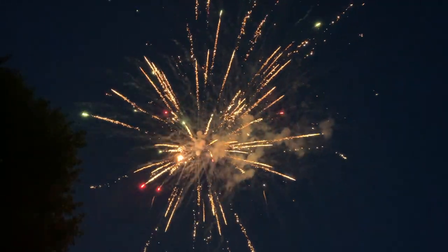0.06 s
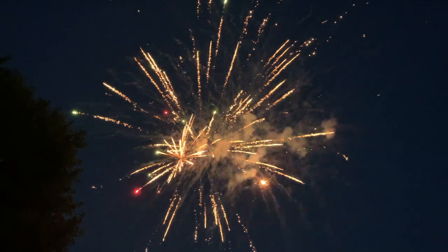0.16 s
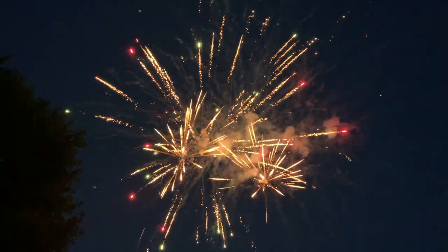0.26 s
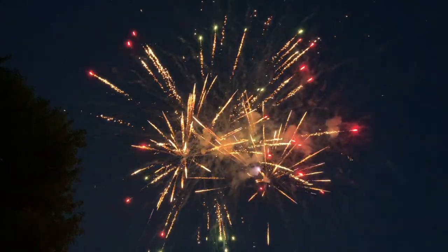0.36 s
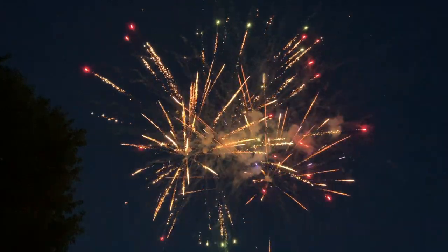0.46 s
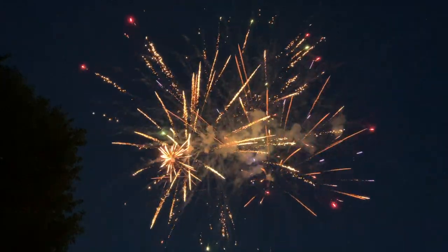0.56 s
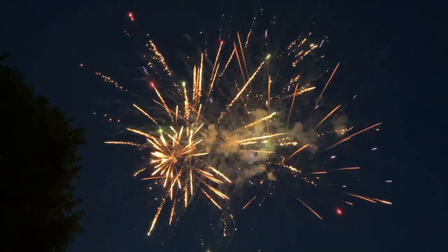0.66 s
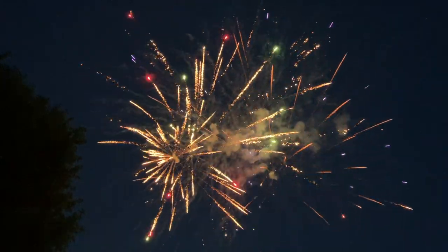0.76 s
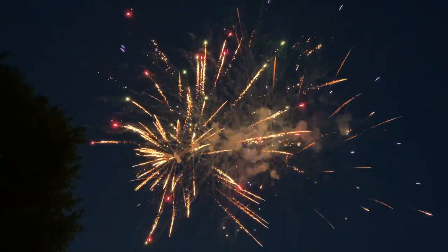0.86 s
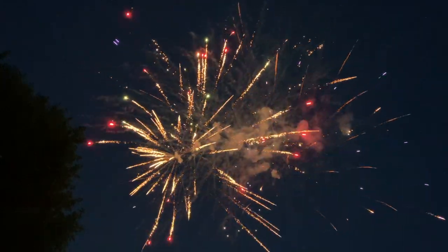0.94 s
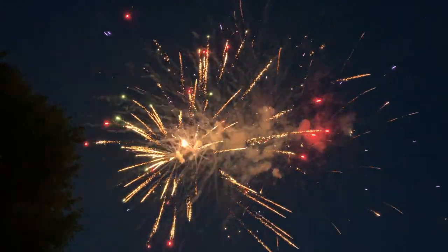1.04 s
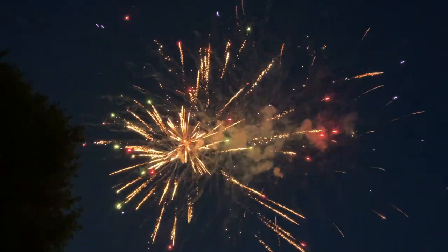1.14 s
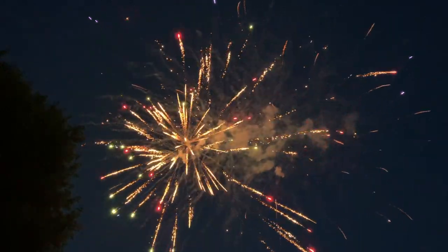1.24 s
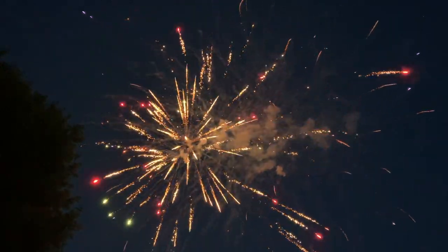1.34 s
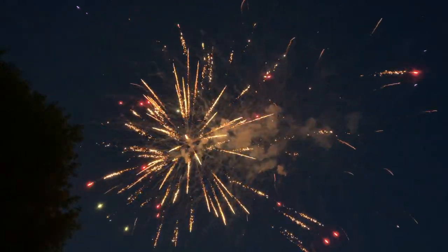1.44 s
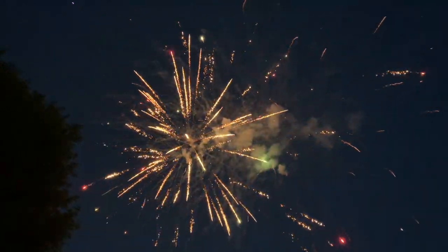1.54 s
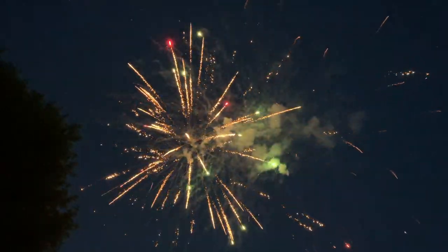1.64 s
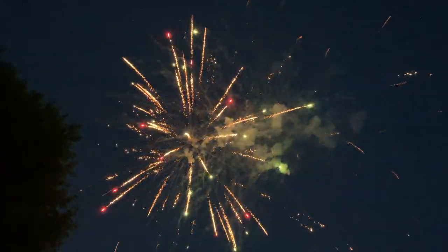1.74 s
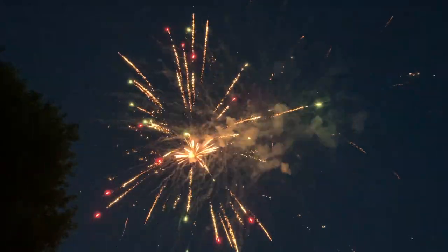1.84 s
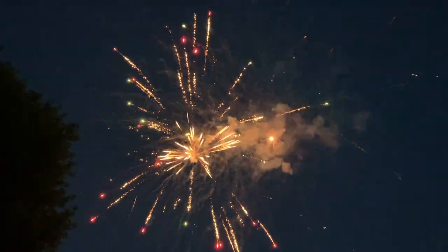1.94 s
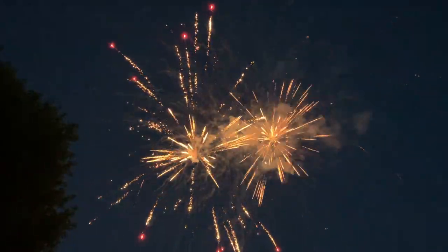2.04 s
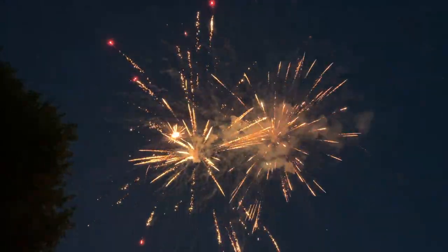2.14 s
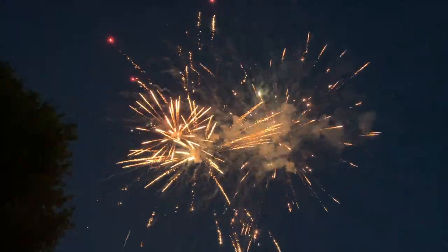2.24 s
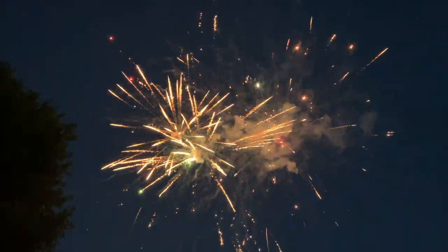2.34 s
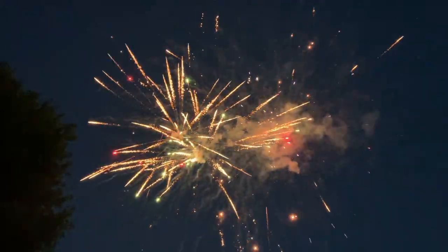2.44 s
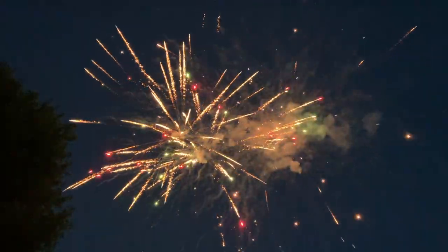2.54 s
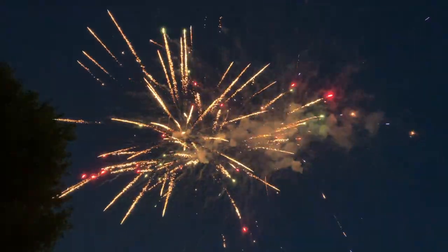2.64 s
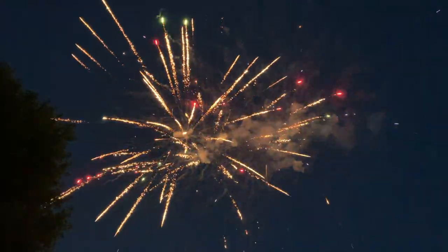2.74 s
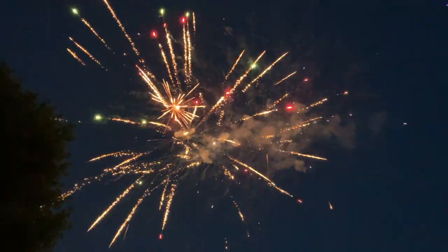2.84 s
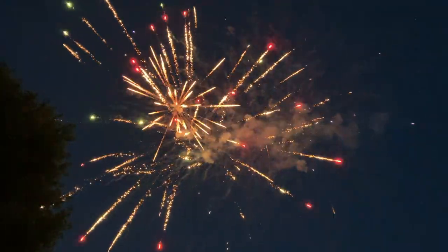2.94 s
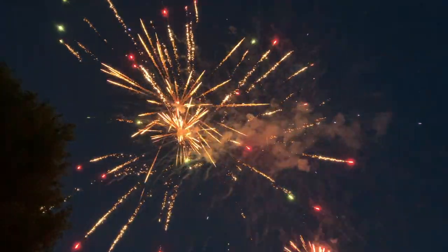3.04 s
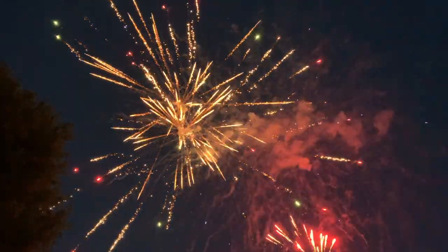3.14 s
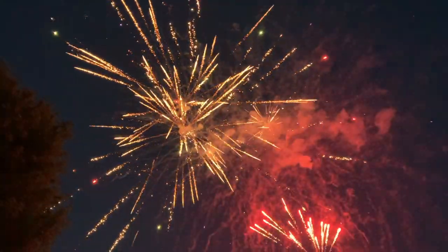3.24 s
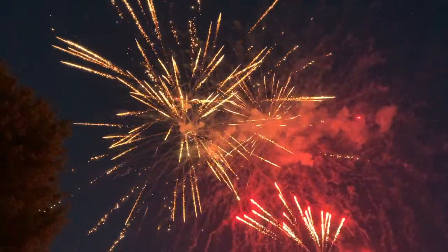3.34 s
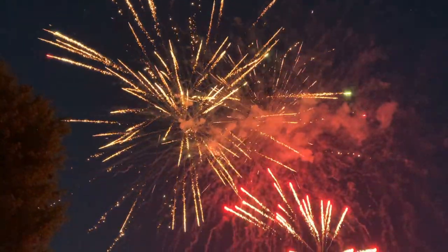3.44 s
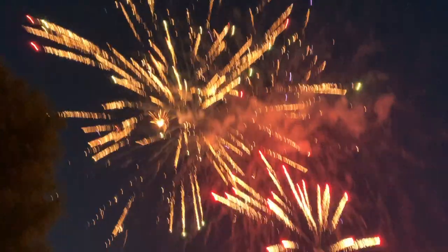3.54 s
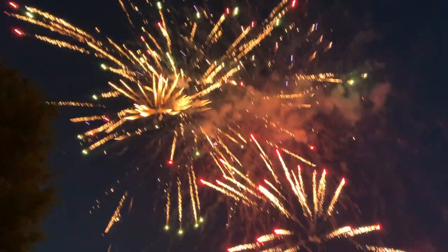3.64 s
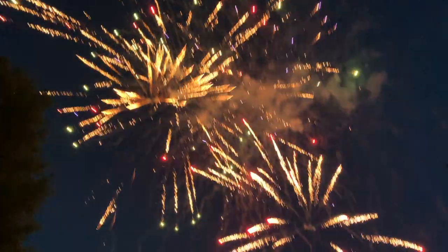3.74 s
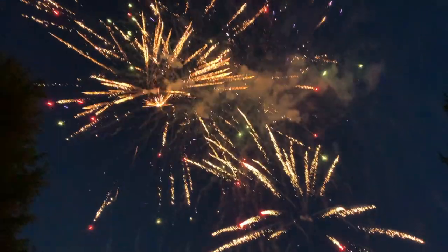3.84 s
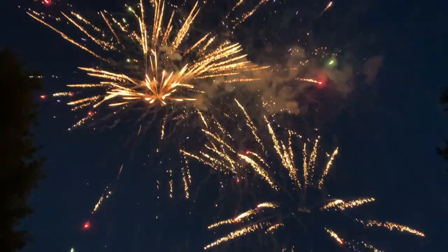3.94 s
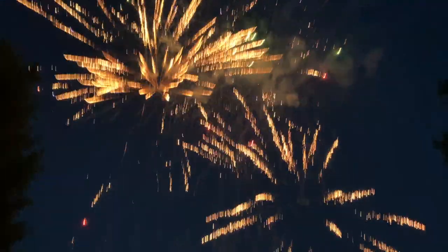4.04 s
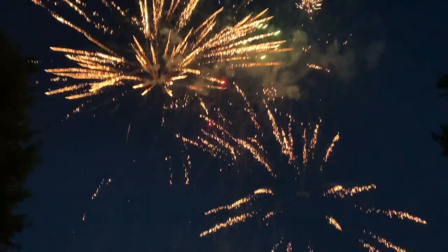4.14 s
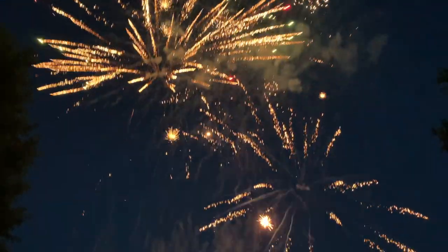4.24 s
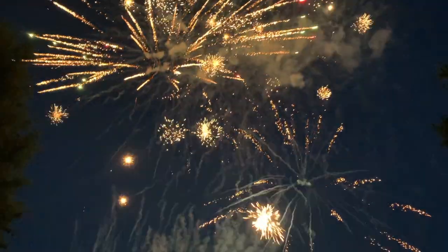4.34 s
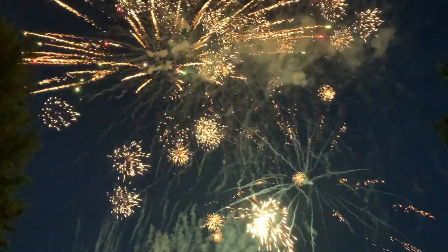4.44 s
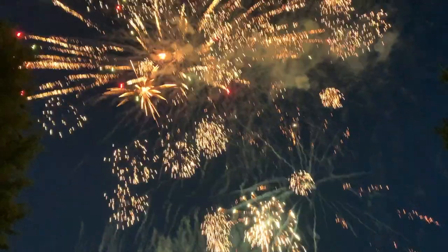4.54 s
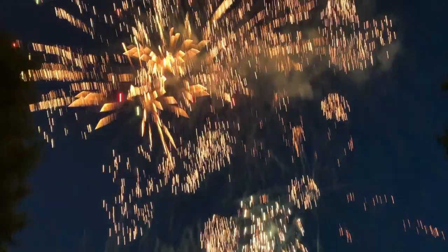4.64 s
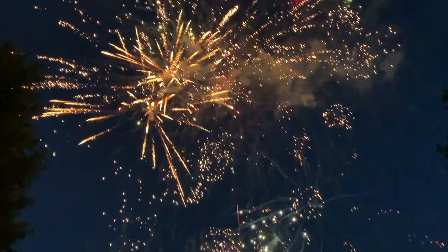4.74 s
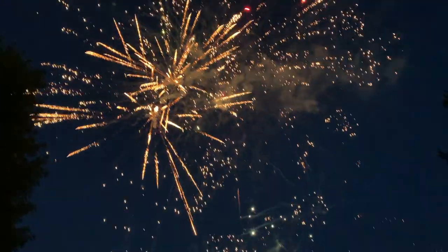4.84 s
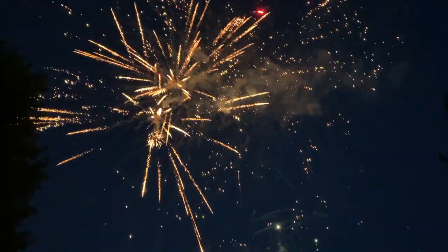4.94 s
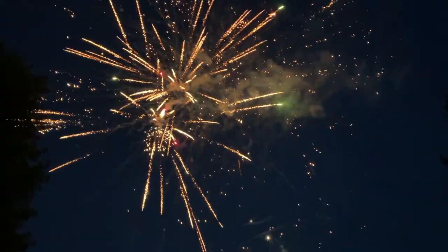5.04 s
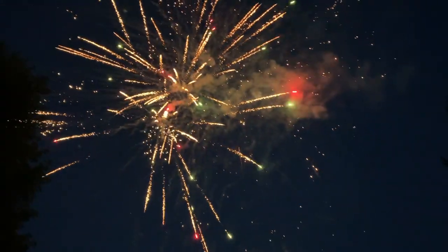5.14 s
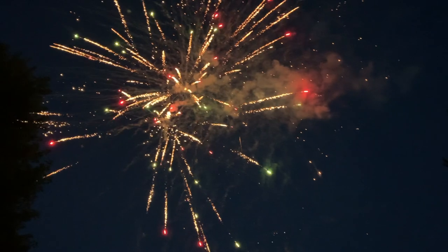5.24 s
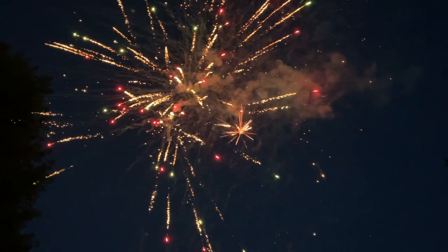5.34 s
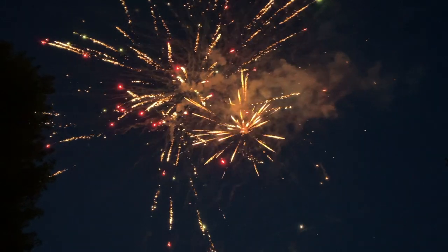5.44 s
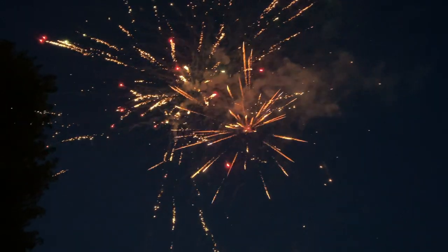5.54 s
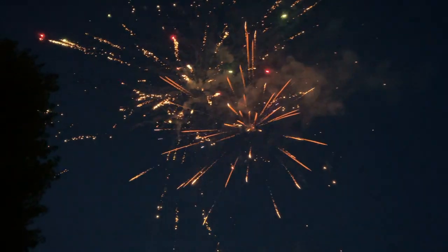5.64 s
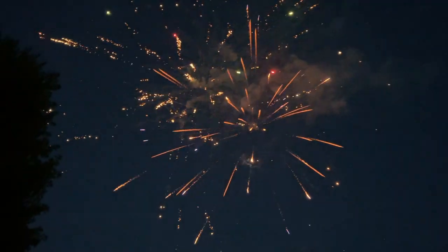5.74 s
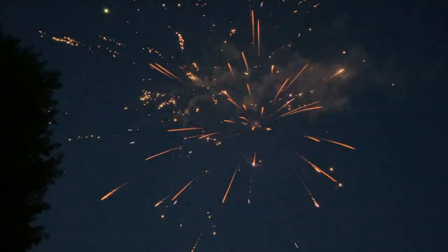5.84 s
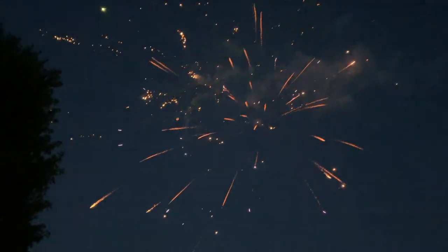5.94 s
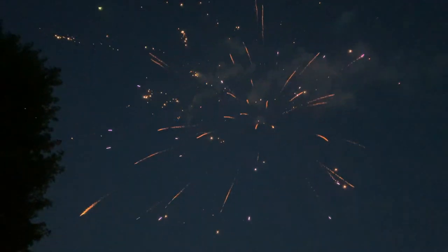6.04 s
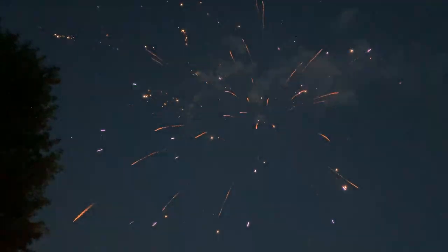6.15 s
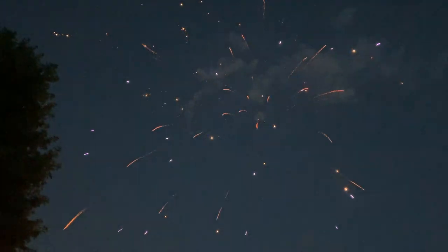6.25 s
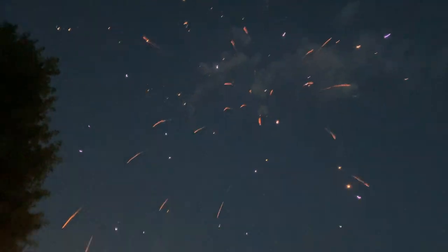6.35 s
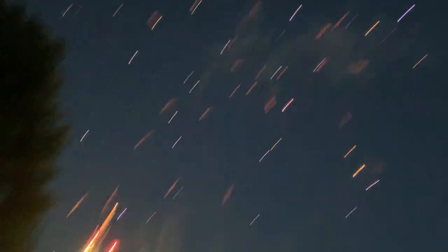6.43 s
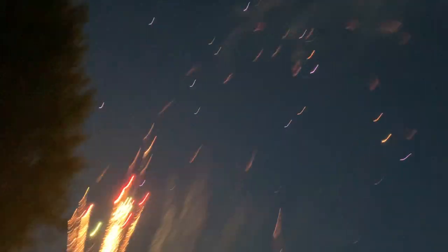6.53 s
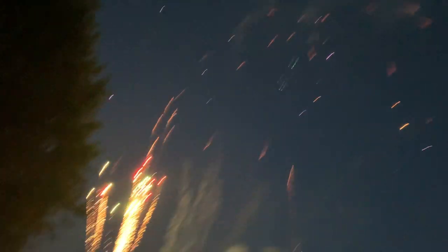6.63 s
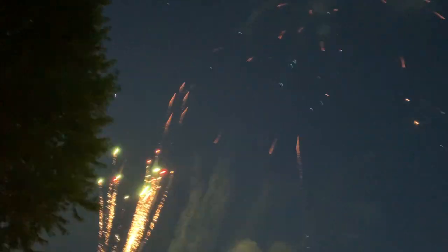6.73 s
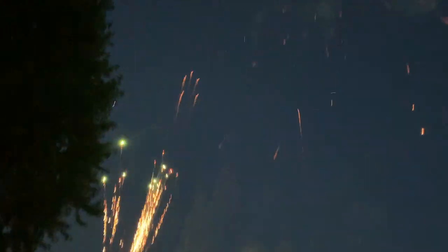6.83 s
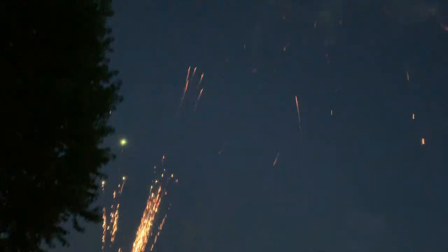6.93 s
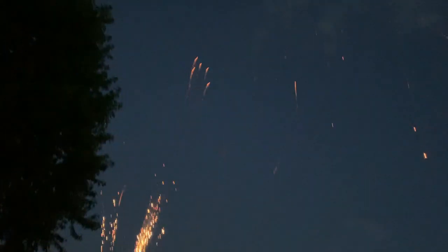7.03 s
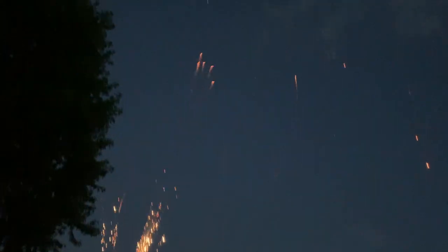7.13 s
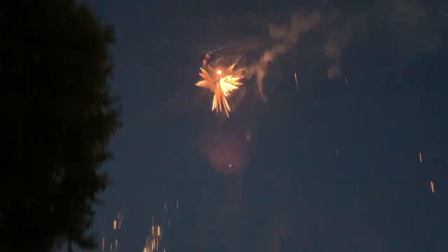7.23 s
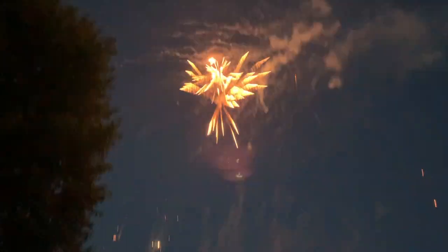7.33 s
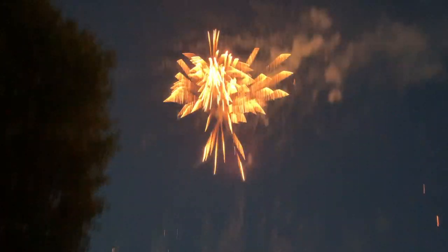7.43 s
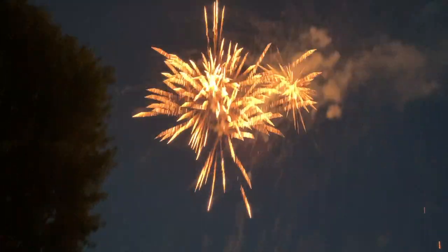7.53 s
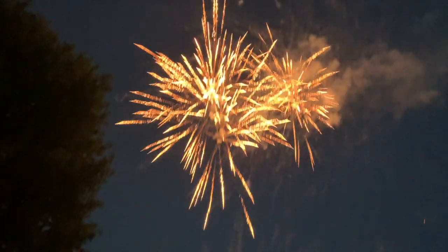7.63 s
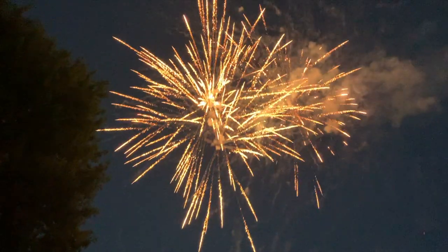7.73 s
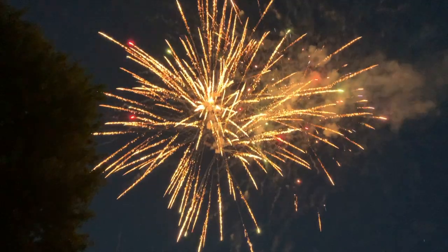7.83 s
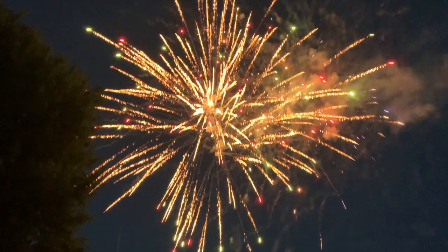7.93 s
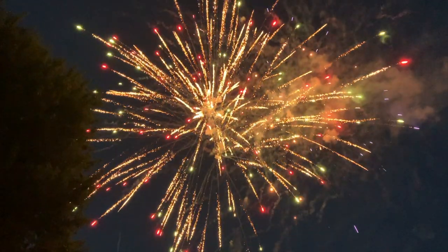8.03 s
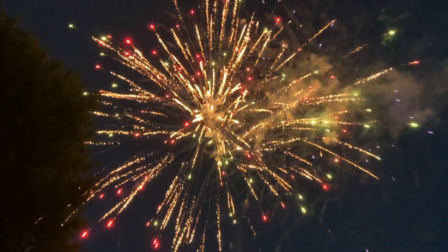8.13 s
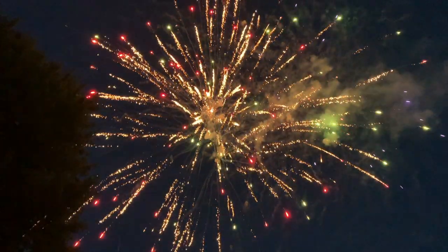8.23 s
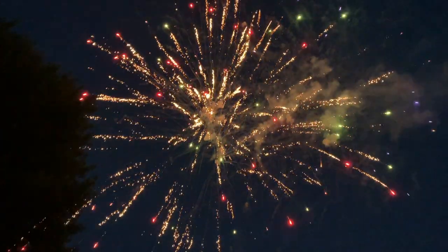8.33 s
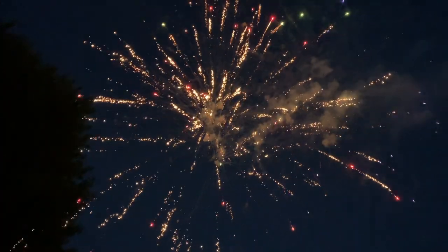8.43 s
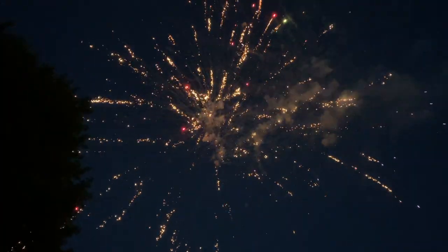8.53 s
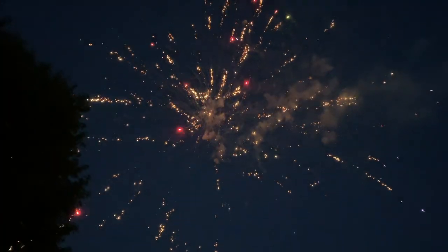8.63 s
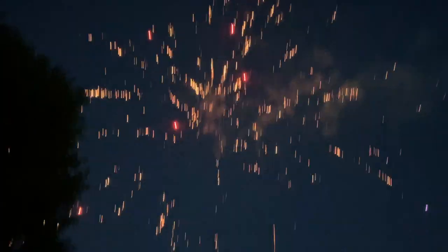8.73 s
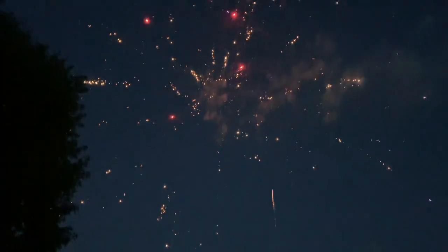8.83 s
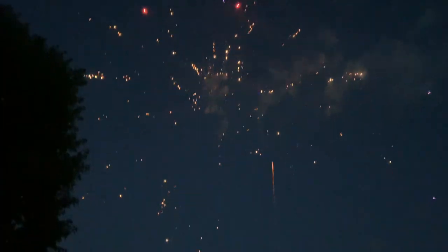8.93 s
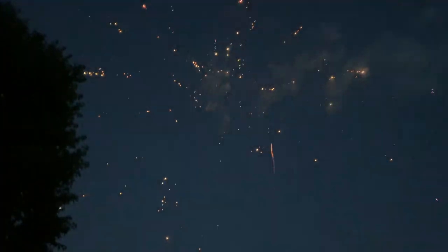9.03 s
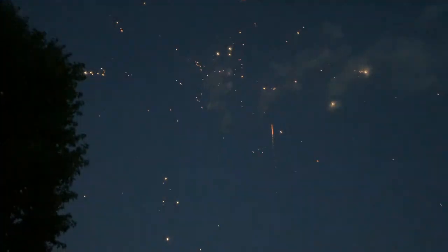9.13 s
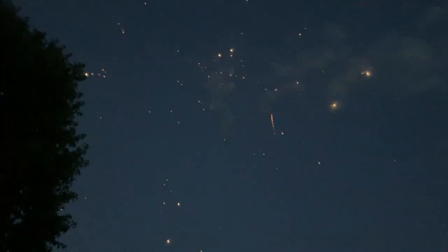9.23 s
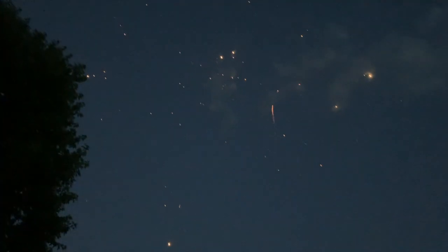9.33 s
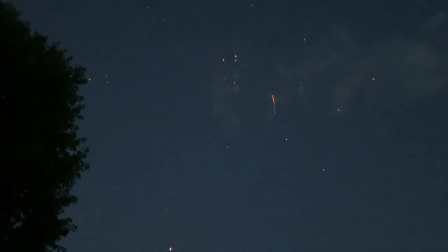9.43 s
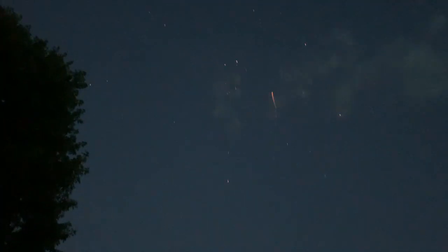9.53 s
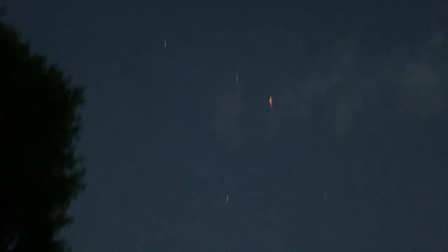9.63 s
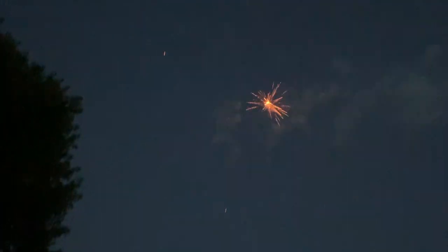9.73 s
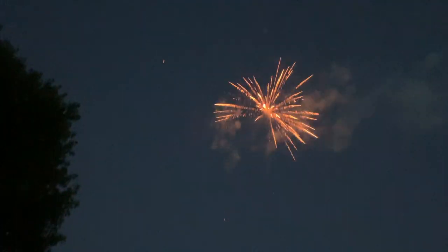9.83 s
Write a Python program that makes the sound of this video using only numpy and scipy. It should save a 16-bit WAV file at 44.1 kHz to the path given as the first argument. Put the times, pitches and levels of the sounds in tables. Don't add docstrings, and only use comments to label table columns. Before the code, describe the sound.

Outdoors at night, firework shells burst close overhead with heavy thumps, booms and sharp snaps. Hollow mortar thuds and dry wall slaps fall between them. Around the middle a short swarm of crackling pops follows a bright crack, then bangs thin out into rumble and faint distant thuds. A rapid cluster of launch thumps leads to a dense volley, then fading echoes and one last bang. Handheld phone sound, stereo, peaks squashed.

```python
import sys
import numpy as np
from scipy import signal
from scipy.fft import rfft, irfft, next_fast_len
from scipy.io import wavfile
from scipy.ndimage import uniform_filter1d

SR = 44100
rng = np.random.default_rng(int(sys.argv[2]) if len(sys.argv) > 2 else 0)


def materialize(psi):
    bounded = np.clip(np.atleast_2d(psi).T, -1, 1)
    quanta = np.round(bounded * 32767).astype(np.int16)
    wavfile.write(sys.argv[1], SR, quanta)


def magnitude_from_level(level_db):
    exponent = np.asarray(level_db, float) / 20
    return 10 ** exponent


N = 435708
HOP = 128
KIT = 4096
T = (np.arange(KIT) - KIT // 4) / SR
HZ = np.fft.rfftfreq(KIT, 1 / SR)


def along(points, hz, axis=1):
    rows = np.asarray(points, float)
    return np.interp(np.log(hz + 1), np.log(rows[:, 0] + 1), rows[:, axis])


def band(hz, lo_hz, hi_hz, order):
    low_side = 1 + (lo_hz / (hz + 1e-3)) ** (2 * order)
    high_side = 1 + (hz / hi_hz) ** (2 * order)
    return 1 / np.sqrt(low_side * high_side)


def filtered(x, response):
    m = next_fast_len(x.shape[-1] + 8192)
    spectrum = rfft(x, m) * response(np.fft.rfftfreq(m, 1 / SR))
    return irfft(spectrum, m)[..., :x.shape[-1]]


def pulse(lo_hz, hi_hz, order, late=0.):
    shape = band(HZ, lo_hz, hi_hz, order=order)
    delay = np.exp(-2j * np.pi * HZ * (KIT // 4 / SR + late))
    return irfft(shape * delay, KIT) / np.mean(shape)


def crack(lo_hz, hi_hz, t60, rise, shared):
    noise = rng.standard_normal((3, KIT))
    mix = np.clip(shared, 0, 1)
    noise = np.sqrt(mix) * noise[0] + np.sqrt(1 - mix) * noise[1:]
    noise = noise * magnitude_from_level(-60 * np.where(T > 0, T / t60, -T / rise))
    out = irfft(rfft(noise) * band(HZ, lo_hz, hi_hz, order=3), KIT)
    return out / np.abs(out).max()


def add(track, s, sound):
    at = round(s * SR) + KIT - KIT // 4
    track[:, at:at + KIT] += sound


# [s, dB]
SKY_ROAR = [(0, -53), (.2, -51.5), (1.499, -55.5), (2.7, -51.5), (4.1, -50), (5.2, -54), (6, -55.5),
            (6.7, -57.5), (7.299, -57.5), (7.9, -47), (8.25, -51.5), (9, -54), (9.88, -58.5)]
# [Hz, dB per Hz]
RUMBLE_COLOUR = [(21, -46.5), (35, -6.5), (161, -2), (186, -19.5), (269, -2.5), (1150, -25), (1560, -54),
                 (2640, -120)]
# [Hz, dB per Hz]
HISS_COLOUR = [(500, -32.5), (900, -20.5), (1250, -4.5), (2200, -10), (4000, -16.5), (7000, -24),
               (9000, -40), (15000, -120)]


def night_power(col, t):
    s, rumble_db = np.transpose(SKY_ROAR)
    hiss_db = -65.5 + 1.7 * (rumble_db - rumble_db.mean())
    rumble = magnitude_from_level(along(RUMBLE_COLOUR, col) + np.interp(t, s, rumble_db)) ** 2
    hiss = magnitude_from_level(along(HISS_COLOUR, col) + np.interp(t, s, hiss_db)) ** 2
    return rumble + hiss


def walls(table, col, since):
    power = 0
    for late, hz, width, length, db in table:
        in_pitch = (np.log2((col + 1) / hz) / width) ** 2
        in_time = ((since - late) / length) ** 2
        power = power + magnitude_from_level(db) ** 2 * np.exp(-in_pitch - in_time)
    return power


# [Hz, dB, s]
TREES_AND_GROUND = [(38.6, -38, .07), (103.2, -53.5, 0.072), (297, -33, 0.29), (968, -41, 0.16),
                    (3000, -48, 0.29), (7560, -47.5, 0.15), (10550, -68.5, 1), (16100, -68, .4)]
# [Hz, dB, s]
FAR_HOUSES = [(40.9, -49, 2.8), (99.9, -61, 0.58), (300, -49.5, 0.62), (970, -62, 1.9), (3000, -61, 1.61),
              (7560, -64.5, 1.19), (11000, -74.5, 0.92), (16000, -85, 0.53)]
# [s, Hz, octaves, s, dB]
SHELL_WALLS = [
    (.021, 2516, 0.75, 0.0033, -62),
    (.1, 612, 0.71, 0.024, -47.5),
    (.21, 3000, .6, .035, -63),
]
# [s, Hz, octaves, s, dB]
MORTAR_WALLS = [
    (0.024, 2800, 0.3, 0.011, -55.5),
    (0.061, 1100, 0.42, 0.0072, -50.5),
    (0.1, 120, 0.52, 0.028, -42.5),
    (0.057, 5000, 0.84, 0.02, -62.5),
]


def echo_power(col, t):
    since = t[None, :SR * 2 // HOP]
    near = magnitude_from_level(along(TREES_AND_GROUND, col) - 60 * since / along(TREES_AND_GROUND, col, axis=2)) ** 2
    back = since - .18
    fading = np.where(back > 0, back / along(FAR_HOUSES, col, axis=2), -back / 3.5)
    far = magnitude_from_level(along(FAR_HOUSES, col) - 60 * fading) ** 2
    shells = near + far + walls(SHELL_WALLS, col, since)
    thin = band(col, 150, 26000, order=2) ** 2
    hollow = thin * (1 - .9 * band(col, 650, 2000, order=2) ** 2)
    echoes = []
    for (s, thump_db, boom_db, _), duck_db in zip(BURSTS, ducking()):
        level_db = 0.5 + 0.29 * thump_db + .12 * boom_db + duck_db
        colour = thin + magnitude_from_level(boom_db + 11.0) ** 2 * (1 - thin)
        echoes.append((s, magnitude_from_level(level_db) ** 2 * colour * shells))
    for s, thump_db, sizzle_db, lag in MORTARS:
        level_db = 2.5 + 0.12 * sizzle_db - 10
        echoes.append((s, magnitude_from_level(level_db) ** 2 * hollow * (near + 0.59 * far)))
        if lag < FACING_LAG:
            echoes.append((s, magnitude_from_level(thump_db + 8.5) ** 2 * walls(MORTAR_WALLS, col, since)))
    power = np.zeros((len(col), len(t) + since.size + HOP))
    for s, echo in echoes:
        at = round(s * SR / HOP) + 2
        power[:, at:at + since.size] += echo
    gone = round(.35 * SR / HOP)
    power[:, :since.size - gone] += magnitude_from_level(3.5) ** 2 * shells[:, gone:]
    return power[:, :len(t)]


# [Hz, -1 to 1]
PORT_LIKENESS = [(60, 0.87), (300, 0.9), (640, 0.0033), (1400, -0.47), (3100, 0.18), (6000, -0.52)]


def outdoors():
    hz, t, z = signal.stft(rng.standard_normal((2, N)), SR, nperseg=4 * HOP, noverlap=3 * HOP)
    z, col = z / np.sqrt(np.mean(np.abs(z) ** 2)), hz[:, None]
    night = night_power(col, t)
    clumps = uniform_filter1d(rng.standard_normal(night.shape), size=14, axis=0)
    clumps = uniform_filter1d(clumps, size=6, axis=1)
    clumps = clumps / clumps.std()
    power = echo_power(col, t) * magnitude_from_level(2.5 * clumps) ** 2 + night * magnitude_from_level(1.15 * clumps + 0.54) ** 2
    turn = np.arccos(np.clip(along(PORT_LIKENESS, col), -1, 1)) / 2
    z = z * np.sqrt(power) * magnitude_from_level(2) * [np.cos(turn), np.sin(turn)]
    z = z * band(col, 1, 15600, order=30)
    mid, side = signal.istft(z, SR, nperseg=4 * HOP, noverlap=3 * HOP)[1][:, :N]
    return np.array([mid + side, mid - side])


def ducking():
    s, thump_db = np.transpose(BURSTS)[:2]
    ahead = magnitude_from_level(thump_db[:-1]) * np.exp(-(np.diff(s) / .062) ** 2)
    return -9 * np.append(0, ahead)


# [s, dB, dB, dB]
BURSTS = [(0.238, -0.3, 2, -11), (0.3252, -1.5, -2.5, -2), (0.671, -1.2, 0, -7.5), (1.2089, -2, 0, -10),
          (1.9281, -2.5, -2, -2.5), (2.113, -1.9, 0, -6.5), (2.2657, -2.5, -1, -8.5), (2.932, -2, 0.5, -10),
          (3.1077, -11, -9, -1), (3.1128, -2.5, -1, -4.5), (3.3649, -3, -0.5, -4.5), (3.6746, -2, 0.5, -8),
          (3.9645, -1.5, -1, -12), (4.429, -8, -35, 0.5), (4.6321, -0.9, -0.5, -9), (4.7166, -5, -3, -1.5),
          (5.4691, -2, -2.5, -10), (7.3328, -0.5, -0.5, -8.5), (7.4265, -2, 0, -8),
          (7.4839, -1.7, -3.5, -7.5), (7.5178, -4, -1.5, -4.5), (7.6301, -0.5, -5, -3),
          (7.6475, -8.5, -2.5, -2.5), (7.6835, -24, -16, -51), (9.8689, -1.5, -2, -2)]


def bursts(track):
    lags = np.array([[-4], [4]]) / SR
    thump = pulse(80, 469, order=6, late=lags)
    thump = thump + magnitude_from_level(-16.5) * pulse(90, 400, order=3, late=2 * lags + 0.015)
    bass_t = T - 4.2 * lags
    ring = np.cos(2 * np.pi * 77 * bass_t) * np.exp(-((T - .018) / .013) ** 2)
    heave = np.cos(2 * np.pi * 60 * (bass_t + .0035)) * np.exp(-((T + .0035) / .011) ** 2)
    push = pulse(36, 115, order=2, late=2 * lags + .0007)
    boom = magnitude_from_level(-6) * ring - magnitude_from_level(-4) * heave + magnitude_from_level(3.5) * push
    for (s, thump_db, boom_db, snap_db), duck_db in zip(BURSTS, ducking()):
        weak_db = min(0, snap_db + 15)
        crack_db = -6.5 + 0.23 * duck_db + weak_db
        sizzle_db = -6.5 + duck_db + weak_db
        rough = .5 * crack(500, 1050, t60=.022, rise=0.023, shared=0.81)
        snap = magnitude_from_level(snap_db) * (pulse(540, 1020, order=4, late=lags + .0004) + rough)
        add(track, s, magnitude_from_level(thump_db + 3.0) * thump + magnitude_from_level(boom_db - 4.5) * boom + snap)
        shock = 0.98 * pulse(900, 5900, order=2, late=2.2 * lags)
        shock = shock + .65 * crack(1200, 4000, t60=0.011, rise=0.023, shared=0.098)
        front = magnitude_from_level(crack_db + 1.56) * shock
        front = front + 0.56 * np.roll(front, round(.00103 * SR), axis=1)
        sizzle = magnitude_from_level(sizzle_db + .7) * crack(6500, 15000, t60=.0025, rise=.002, shared=.9)
        add(track, s + .0012, front + sizzle)


# [s, dB peak]
SLAPS = [(0.7656, -17.5), (1.8751, -22), (1.886, -26), (2.0194, -18.5), (2.36, -23), (2.8665, -28.5),
         (3.0615, -21.5), (3.7703, -21.5), (4.2457, -23), (0.407, -24), (0.349, -17), (7.61, -25),
         (1.279, -22), (5.5475, -25.5), (6.4378, -26), (7.7237, -42), (8.335, -23), (8.4255, -30.5)]


def slaps(track):
    for s, db in SLAPS:
        add(track, s, magnitude_from_level(db + 2.5) * crack(1900, 4300, t60=0.0029, rise=0.009, shared=0.14))


FACING_LAG = 4.2
# [s, dB, dB, samples the right port is late]
MORTARS = [(0.3995, -10, -24.5, 14), (0.4784, -4.5, -5, 3), (0.8717, -5.5, -10, 23),
           (1.272, -11, -14.5, 13), (1.7198, -11.5, -8, 5.5), (1.7244, -14, -24.5, 6.5),
           (1.768, -6, -3, 11), (1.7714, -3, -1, 2), (2.759, -5, -16.5, 16), (4.2898, -4, -2.5, 3.5),
           (6.06, -4.5, -8.5, 20), (6.0923, -7.5, -9.5, 14), (6.1584, -7, -20, 13), (6.199, -6.5, -10, 23),
           (6.2386, -7, -7, 14), (6.3232, -4, -5, 3.5), (8.3105, -3.5, -2, 4)]


def mortars(track):
    for s, thump_db, sizzle_db, lag in MORTARS:
        crack_db = -11 + .22 * sizzle_db
        lags = np.array([[-lag], [lag]]) / 2 / SR
        thump = pulse(57, 342, order=5, late=lags)
        thump = thump + magnitude_from_level(-24.5) * pulse(110, 340, order=3, late=lags + .011)
        front = magnitude_from_level(crack_db + 5.0) * crack(3200, 9800, t60=0.0054, rise=0.0026, shared=0.15)
        front = front + magnitude_from_level(sizzle_db - .5) * crack(7000, 13000, t60=.003, rise=.002, shared=.9)
        add(track, s, magnitude_from_level(thump_db + 1.5) * thump + front)
        if lag < FACING_LAG:
            add(track, s, magnitude_from_level(thump_db - 13) * crack(600, 3600, t60=0.0094, rise=.002, shared=0.76))
        else:
            ping = np.cos(2 * np.pi * 2690 * T) * np.exp(-(T / .0024) ** 2)
            add(track, s + 0.0082, magnitude_from_level(thump_db - 24.5) * ping)
        add(track, s + .0138, magnitude_from_level(-17) * front)


# [s, dB peak]
STARS = [(4.3133, -26), (4.3227, -21), (4.3524, -27), (4.366, -26), (4.3734, -22), (4.3879, -19.5),
         (4.3944, -19.5), (4.3972, -20.5), (4.409, -20), (4.4504, -25), (4.4797, -24.5), (4.4854, -23.5),
         (4.5024, -26), (4.5134, -26), (4.5373, -21.5), (4.5537, -24.5), (4.5604, -25), (4.57, -19.5),
         (4.5834, -21.5), (4.5894, -21.5), (4.5976, -22.5), (4.603, -25), (5.1108, -23.5)]


def stars(track):
    swarm = [(4.33 + .29 * when, -41 + 12 * size ** 2) for when, size in rng.random(size=(150, 2))]
    for s, db in list(STARS) + swarm:
        pop = magnitude_from_level(db + 3.5) * crack(1279, 9100, t60=0.0073, rise=0.00098, shared=0.2)
        body_db = min(db, -11.5 + 0.56 * db)
        body = magnitude_from_level(body_db - 0.5) * crack(340, 2000, t60=0.017, rise=0.0037, shared=0.83)
        add(track, s, pop + body)


# [s, dB peak]
THUDS = [
    (5.03, -39),
    (6.618, -46),
    (6.66, -46.5),
    (6.878, -42),
    (7.259, -41),
    (8.759, -51),
    (9.098, -44),
]


def thuds(track):
    for s, db in THUDS:
        add(track, s, magnitude_from_level(db + 8.5) * pulse(45, 140, order=2)[None])


def scene():
    track = np.zeros((2, N + 2 * KIT))
    air = outdoors()
    for play in (bursts, slaps, mortars, stars, thuds):
        play(track)
    return track[:, KIT:KIT + N] + air


def band_limit(x):
    return signal.sosfilt(signal.butter(12, 17170, fs=SR, output="sos"), x)


def record(dry):
    def low(hz):
        return 1 / (1 + (hz / 6900) ** 14)

    def shade(hz):
        return magnitude_from_level(np.array([[-1.3], [.7]]) * band(hz, 4300, 9000, order=3))

    def skew(hz):
        return np.exp(1j * np.pi * (10950 - hz) / 4800 * np.array([[1], [-1]]))

    def sweep(hz):
        falling = np.exp(-8.1j * np.log((hz + 1) / 205))
        return falling * band(hz, 1, 16300, order=40) * band(hz, 32, 30000, order=3)

    pair = filtered(dry, lambda hz: np.sqrt(low(hz)) * shade(hz))
    pair = pair + filtered(dry[[0, 0]], lambda hz: np.sqrt(1 - low(hz)) * skew(hz))
    swept = filtered(pair, sweep)
    capped = swept / (1 + np.abs(swept / .93) ** 7) ** (1 / 7)
    return band_limit(capped)


dry = scene()
out = record(dry)
materialize(out)
```